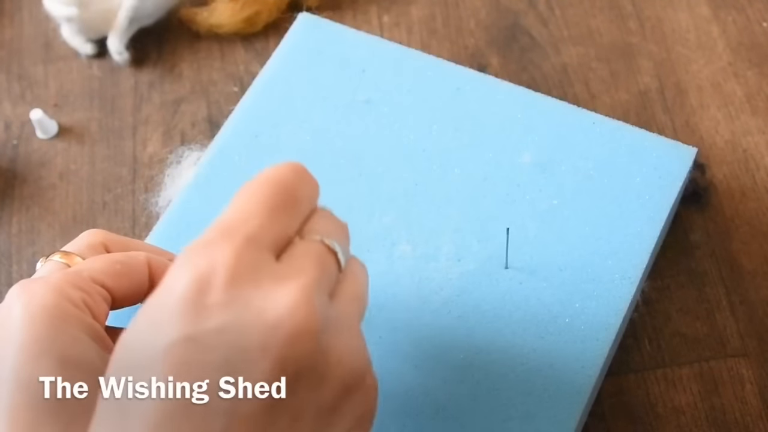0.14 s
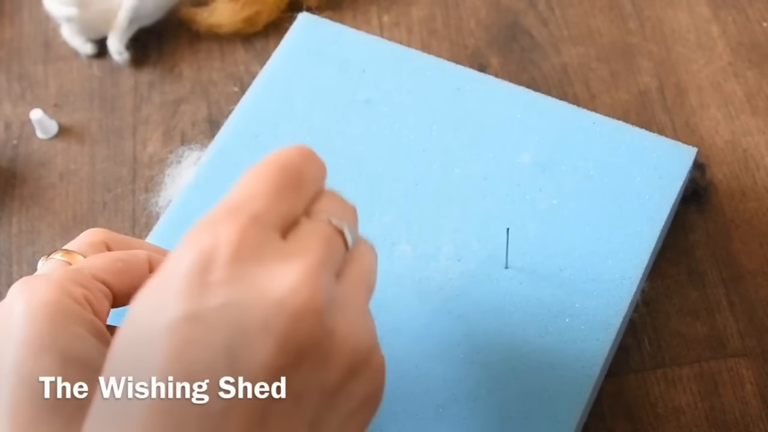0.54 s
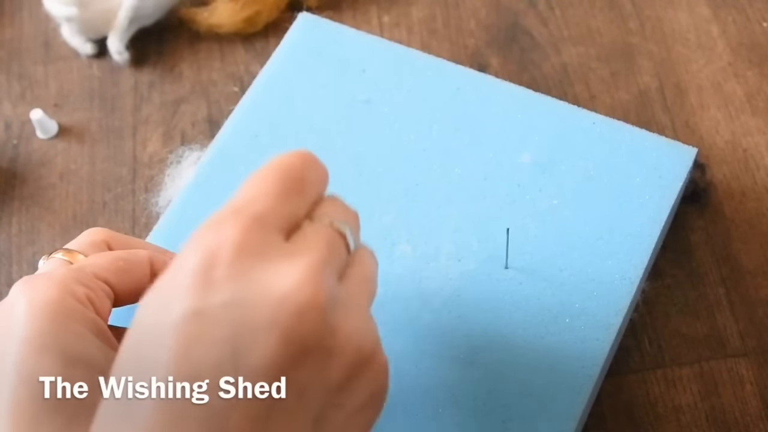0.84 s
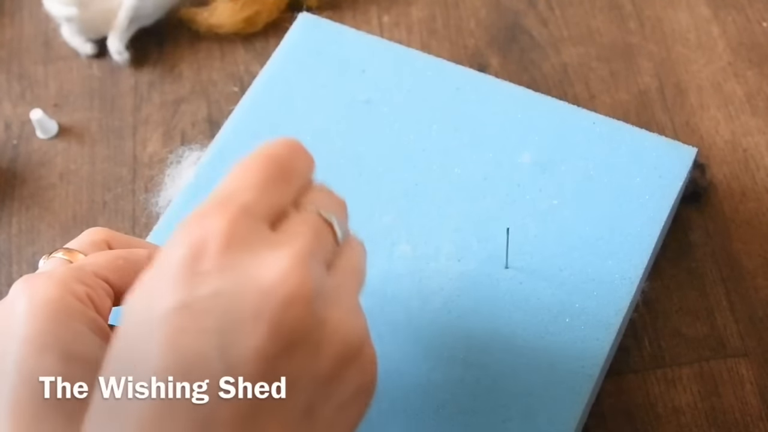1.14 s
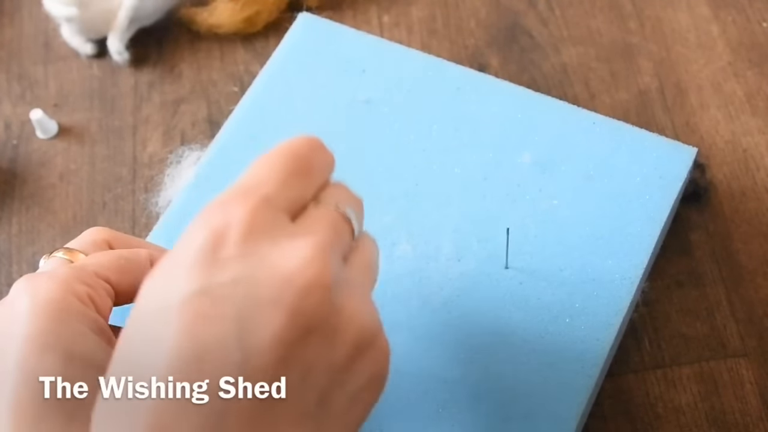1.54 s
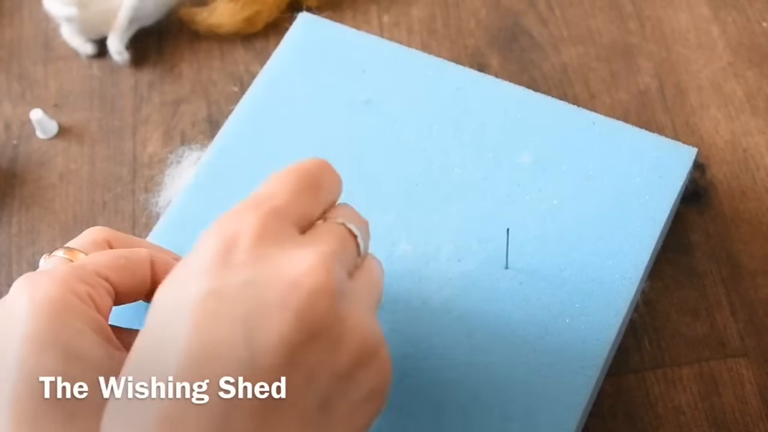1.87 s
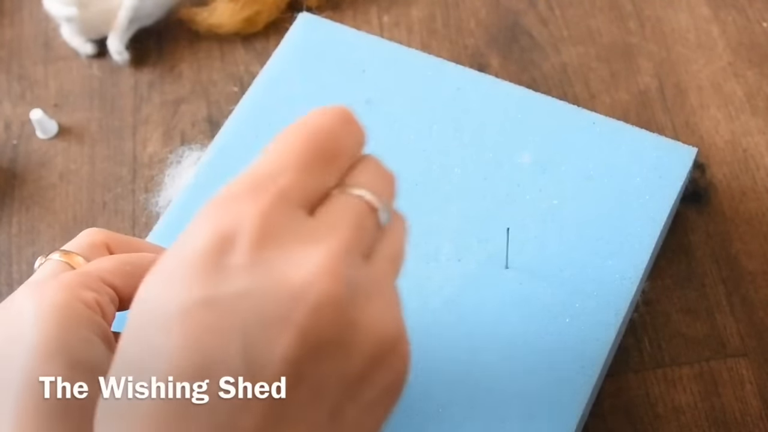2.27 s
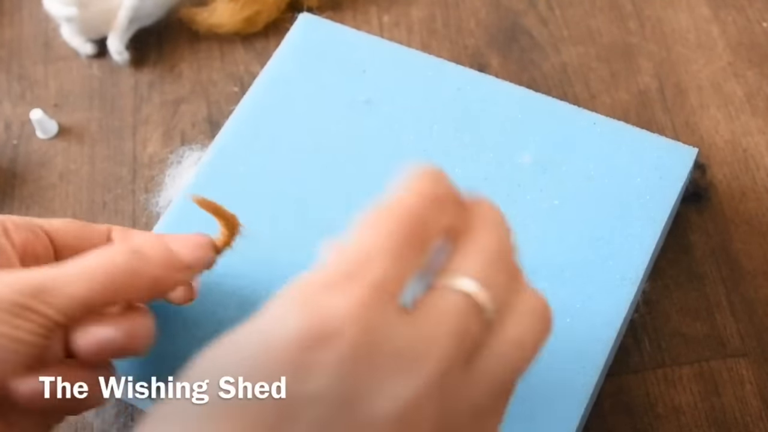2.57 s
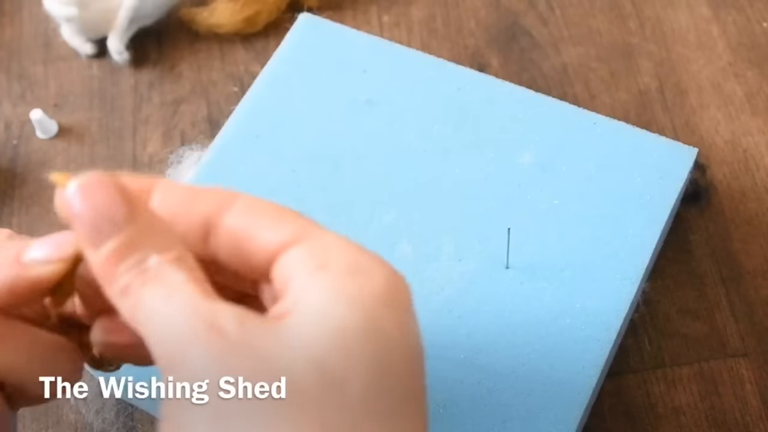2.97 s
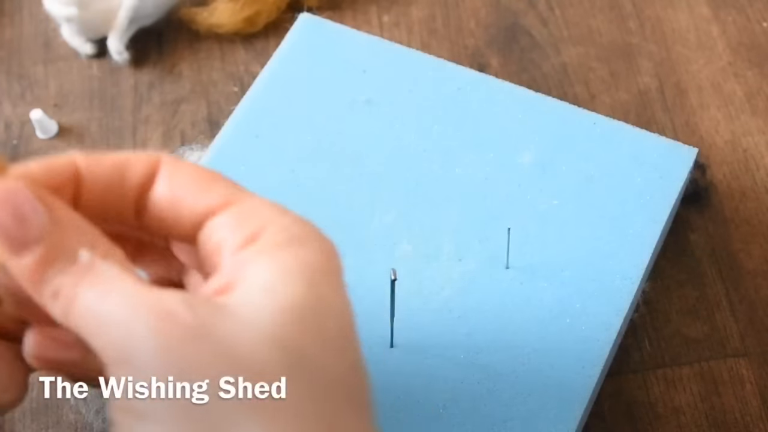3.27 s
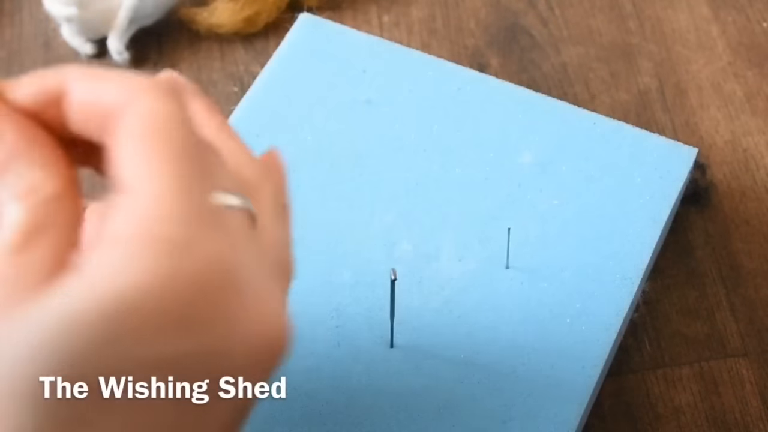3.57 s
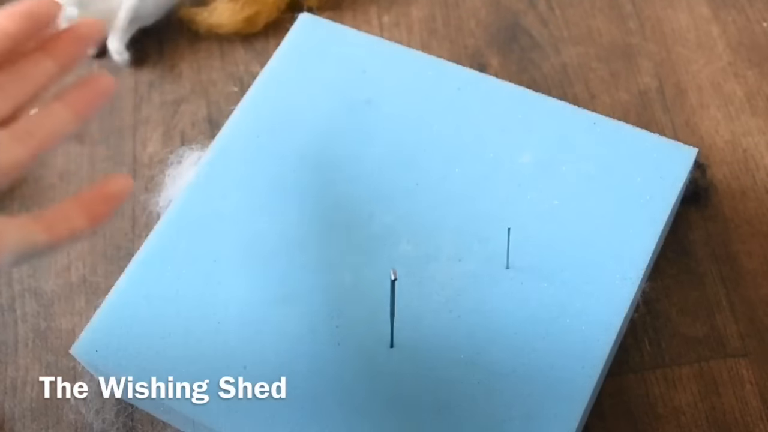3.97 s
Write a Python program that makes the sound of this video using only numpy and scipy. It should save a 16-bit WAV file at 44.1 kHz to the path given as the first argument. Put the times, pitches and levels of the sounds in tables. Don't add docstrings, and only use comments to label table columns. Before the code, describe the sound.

A small microphone sits close above a foam pad on a table in a quiet, dry room with a faint steady hush and slight low rumble. From 0 to about 2.25 s a barbed needle jabs a wool tuft roughly six times a second. Each jab is a short swelling crunch: a dull hollow foam thump with torn-fibre crackle and a thin steely edge, ending abruptly, then a weaker, smoother drag out. Strength varies; strong snaps fall near 0.1, 0.7, 1.06, 1.25 and 1.93 s. Around 2.5 s the needle goes into bare foam with a longer, rougher crackling crunch and a soft settling. Near-quiet follows, with tiny ticks at 2.7 s. At 3.14 s a finger ring clicks sharply with a tiny rattle as fingers roll the wool, a soft rasp with faint metallic pings until 3.3 s. Light ticks come at 3.6 s, then two airy wool pulls around 3.9 and 4.05 s.

```python
import sys
import numpy as np
from scipy import signal
from scipy.fft import rfft, irfft
from scipy.io import wavfile
from scipy.ndimage import uniform_filter1d

SR = 44100
rng = np.random.default_rng(int(sys.argv[2]) if len(sys.argv) > 2 else 0)


def undo_db(level):
    steps = np.asarray(level, float) / 20
    return 10 ** steps


def dump_mix(stems):
    frames = np.atleast_2d(stems).T
    limited = np.clip(frames, -1, 1)
    pcm = np.round(limited * 32767).astype(np.int16)
    wavfile.write(sys.argv[1], SR, pcm)


N = 181251
TIME = np.arange(N) / SR

# centre [Hz], width [Hz], level [dB]
PAD_MODES = [(699, 265, 4.5), (1052, 113, -2.5), (1300, 230, -0.5), (1990, 170, -8.5), (2145, 450, -4)]
# centre [Hz], width [Hz], level [dB]
NEEDLE_MODES = [(2930, 1720, 4), (4280, 580, -2), (5020, 650, 7), (7460, 1060, 3), (8400, 1750, 0),
                (9850, 840, -28), (11500, 480, -14.5), (14000, 3200, -13.5)]


def unit(x):
    return x / np.sqrt(np.mean(x ** 2))


def smooth_twice(x, first, second):
    return uniform_filter1d(uniform_filter1d(x, size=first), size=second)


def ring(x, modes, order=1):
    out = 0
    for k, (hz, width, db) in enumerate(modes):
        sharpness = max(hz / width / order ** .5, .3)
        b, a = signal.iirpeak(min(hz, .45 * SR), sharpness, fs=SR)
        one = x
        for _ in range(order):
            one = signal.lfilter(b, a, one)
        out = out + (-1) ** k * undo_db(db) * np.sqrt(1000 / width) * one
    return out


def crackle(rate, spread_db, fizz, clump_db):
    hit = rng.random(N) < rate / SR
    sign = np.sign(rng.standard_normal(N))
    size = undo_db(spread_db * np.minimum(rng.exponential(size=N), 3))
    clump = unit(smooth_twice(rng.standard_normal(N), 70, 70))
    return (unit(hit * sign * size) + fizz * rng.standard_normal(N)) * undo_db(clump_db * clump)


def frayed(x, ms):
    size = int(ms * SR / 1000) + 3
    burst = unit(np.hanning(size)) / np.sqrt(size)
    ragged = rng.uniform(-np.sqrt(3), np.sqrt(3), N)
    return signal.fftconvolve(x, burst, "same") * ragged


def add(out, s, db, burst):
    i = int(s * SR)
    out[i:i + len(burst)] += undo_db(db) * burst / np.abs(burst).max()


def swell(s, attack, hold, release, db, drift_db=0):
    moments = s + np.cumsum([0, attack, hold, release])
    levels = db + np.array([-30, 0, drift_db, drift_db - 30])
    return undo_db(np.interp(TIME, moments, levels, left=-200, right=-200))


def rubbed(gain, modes, grain):
    return ring(gain * grain, modes, order=2) / np.std(ring(grain, modes, order=2))


def room():
    # frequency [Hz], level [dB per Hz]
    hush = [(20, -18), (50, -12), (100, -5), (330, -3.5), (1500, -9.5), (3500, -12), (8000, -17.5),
            (15500, -26)]
    hz = np.maximum(np.fft.rfftfreq(N, 1 / SR), 1)
    f, db = np.transpose(hush)
    colour = undo_db(np.interp(np.log(hz), np.log(f), db))
    return undo_db(-58.5) * unit(irfft(rfft(rng.standard_normal(N)) * colour, N))


def rumble():
    wander = unit(smooth_twice(rng.standard_normal(N), 2500, 2500))
    table_top = [(129, 150, 0), (410, 60, -12)]  # Hz, width Hz, dB
    return undo_db(-76 + 5 * wander) * unit(ring(rng.standard_normal(N), table_top, order=2))


def ticks():
    # start [s], peak [dB], centre [Hz], length [ms]
    puffs = [(.5, -49, 8100, 2.9), (0.612, -45, 4300, .8), (.626, -50.5, 7600, 2.2),
             (.9535, -48, 8400, 1.2), (1.0156, -48.5, 300, 4.2), (1.4098, -41, 1200, 1.5),
             (1.6354, -46, 8500, .87), (1.6392, -45, 9000, .8), (1.6448, -48, 9000, .44),
             (2.06, -48, 900, 1.5), (2.0722, -36.5, 930, 0.97), (2.106, -42.5, 6940, 0.74),
             (2.2312, -38, 1480, 0.94), (2.236, -46, 410, 4), (2.293, -49, 1100, 3),
             (2.712, -47, 11500, 1.4), (2.718, -48, 10500, .8), (2.7212, -47, 8000, .6),
             (2.7292, -53, 12000, .6), (3.6175, -48, 9000, .3), (3.636, -48, 13500, .8),
             (3.661, -49, 5900, 0.87), (3.8695, -38, 10000, 1.9), (3.8701, -47, 14000, .58),
             (3.872, -48, 7100, .98), (3.8835, -45, 8000, .5), (3.9462, -39, 8400, .38)]
    out, n = np.zeros(N), np.arange(400)
    for s, db, hz, ms in puffs:
        u = n / (ms * SR / 1000)
        puff = rng.standard_normal(400) * u * np.exp(-2 * u)
        width = 0.34 * hz
        one = ring(puff, [(hz, width, 0)])
        add(out, s, db, ring(one, [(hz, 2.2 * width, 0)]))
    return out


def band(gain, grain):
    # centre [Hz], width [Hz], level [dB]
    band_modes = [(3730, 55, -2), (3800, 46, -1), (4125, 40, -5), (7760, 90, -6)]
    # start [s], peak [dB], pitch [Hz], width [Hz]
    nicks = [
        (3.1436, -57, 4125, 6.5),
        (3.247, -47, 3440, 70),
        (3.247, -53, 4140, 60),
        (3.267, -48, 3780, 65),
        (3.222, -55, 3750, 28),
        (3.288, -51, 3800, 21),
    ]
    out = undo_db(-10) * ring(gain * grain, band_modes) / np.std(ring(grain, band_modes))
    t = np.arange(4000) / SR
    for s, db, hz, width in nicks:
        fade = (1 - np.exp(-t / .002)) * np.exp(-np.pi * width * t)
        add(out, s, db, fade * np.sin(2 * np.pi * hz * t))
    return out


def ring_click(out):
    # centre [Hz], width [Hz], level [dB]
    click_modes = [(246, 370, -18), (1000, 130, -3), (2320, 200, 1), (3900, 920, 3), (6700, 550, 1),
                   (6490, 53, 4), (9600, 3200, 8.5), (9600, 68, 3), (10500, 49, -2), (11200, 90, -19),
                   (13500, 6600, -6)]
    finger_modes = [(197, 190, 3.0), (657, 92, -3), (1030, 170, -5.5)]  # Hz, width Hz, dB
    click_s, click_db = 3.1436, -28
    t = np.arange(2500) / SR
    fade = np.exp(-t / .0005) + .14 * np.exp(-t / .013)
    rattle = fade * np.sign(rng.standard_normal(len(t)))
    add(out, click_s, click_db, ring(rattle, click_modes))
    thud = np.exp(-t / 0.023) * rng.standard_normal(len(t))
    add(out, click_s, click_db - 17.0, ring(thud, finger_modes, order=2))


def fingers():
    # start [s], attack [s], hold [s], release [s], level [dB]
    roll_rubs = [
        (3.146, 0.0025, 0.0034, 0.12, -60.5),
        (3.115, 0.12, 0.043, 0.052, -50.5),
    ]
    # start [s], attack [s], hold [s], release [s], level [dB]
    pull_rubs = [
        (3.791, 0.092, 0.06, .16, -56.5),
        (3.946, .081, .047, .046, -51.5),
    ]
    # centre [Hz], width [Hz], level [dB]
    roll_tone = [(2430, 810, -2.5), (3600, 560, -2), (5670, 2700, -0.5), (7770, 630, -1), (9260, 1400, 2.5),
                 (11000, 1200, -5), (12400, 1500, 1.5), (14400, 500, -6), (15400, 800, -14)]
    # centre [Hz], width [Hz], level [dB]
    pull_tone = [(600, 620, -27), (3230, 2500, -2), (5400, 1900, -0.5), (8600, 3100, 3), (14000, 3000, -4)]
    press_db = 4
    rolling = sum(swell(*rub, press_db) for rub in roll_rubs)
    pulling = sum(swell(*rub, press_db) for rub in pull_rubs)
    rasp = frayed(np.abs(crackle(1700, 2.4, 0.7, 1.1)), 0.48)
    out = rubbed(rolling, roll_tone, rasp) + band(rolling, rasp)
    out += rubbed(pulling, pull_tone, crackle(6000, 2.0, 0.95, 0.6))
    ring_click(out)
    return out


def stab():
    # centre [Hz], width [Hz], level [dB]
    block_modes = [(273, 260, -14), (543, 190, -4.5), (1030, 440, -13), (1800, 210, -3.5),
                   (2320, 210, -8.5), (3450, 700, 0.5)]
    # centre [Hz], width [Hz], level [dB]
    cell_tone = [(5510, 540, -1), (6940, 1800, -14.5), (8400, 1040, -3.5), (10500, 1800, -19),
                 (12640, 920, -8.5), (14800, 1200, -20)]
    # Hz, width Hz, dB
    closing_tone = [(673, 1700, -1.5), (3020, 2200, -3.0), (6000, 3000, -1.5),
                    (9000, 3600, -4.0), (13500, 4000, -9)]
    s, attack = 2.477, 0.012
    burst = np.abs(crackle(600, 3.0, .4, 2.5))
    giving = swell(s, attack, hold=0.034, release=0.056, db=-33, drift_db=-4.5)
    bursting = swell(s, attack, hold=0.04, release=0.053, db=-36, drift_db=-1.5)
    closing = swell(s, 0.067, hold=.001, release=0.17, db=-46)
    block = rubbed(giving, block_modes, frayed(burst, 1.3))
    cells = rubbed(bursting, cell_tone, frayed(burst, 1.3))
    settle = rubbed(closing, closing_tone, crackle(3000, 2.7, .9, 1.0))
    return block + cells + settle


def snaps():
    # start [s], pad peak [dB], bright peak [dB]
    fibres = [(.0008, -35.5, -58), (.0835, -31, -56), (.087, -19.5, -33.5), (0.1015, -34, -37),
              (.2609, -36, -29), (.3924, -38, -43), (.4110, -32, -32.5), (.4285, -49, -35),
              (0.5435, -28.5, -36), (.5563, -32, -56), (.7094, -36.5, -42), (0.7174, -20.5, -55),
              (.8692, -31.5, -45), (1.053, -29, -57), (1.0624, -21, -30), (1.0654, -44, -28.5),
              (1.0784, -46, -29.5), (1.2430, -23, -31), (1.2527, -31, -30), (1.2612, -29.5, -27.5),
              (1.423, -25.5, -38), (1.564, -33, -56), (1.7509, -32.5, -35), (1.7693, -36.5, -36),
              (1.9197, -26.5, -44), (1.9313, -18.5, -25), (1.9454, -59, -28), (2.0797, -31, -37.5),
              (2.0950, -25.5, -38.5), (2.2382, -36, -42)]
    # start [s], pad peak [dB], bright peak [dB]
    catches = [
        (2.4766, -51, -46),
        (2.4921, -28.5, -32),
        (2.5160, -34, -24),
        (2.524, -33, -32),
    ]
    s, pad_db, bright_db = np.transpose(np.vstack([fibres, catches]))
    u = np.arange(400) / (.0006 * SR)
    steel, blows = np.zeros(N), np.zeros(N)
    for at, db in zip(s, bright_db):
        tearing = rng.uniform(-2.5, 1, 400) * u * np.exp(-u)
        add(steel, at - .0002, db + 1, ring(tearing, NEEDLE_MODES, order=2))
    np.add.at(blows, (s * SR).astype(int), undo_db(pad_db + 1.0))
    pad_peak = np.abs(ring(np.eye(1, 600)[0], PAD_MODES)).max()
    return -blows / pad_peak, steel


def strokes():
    # needle at rest [s], push length [s], pad thump [dB], bright crackle [dB],
    # drag out against these two [dB]
    jabs = [(.008, 0.036, -47, -55.5, -12.5), (.125, .06, -44, -50.5, -10.5), (.274, 0.044, -37, -37, -15),
            (0.426, 0.044, -37, -43, -15), (.559, 0.024, -49, -62, -8.5), (.727, 0.041, -51, -66, -1),
            (.876, 0.018, -52.5, -61, -6), (1.082, 0.038, -37.5, -37.5, -12.5),
            (1.269, 0.046, -38.5, -40, -12), (1.445, 0.057, -43, -44.5, -13.5),
            (1.571, 0.015, -59, -76, -9), (1.775, 0.045, -45.5, -49, -9.5), (1.952, 0.049, -39, -40, -13),
            (2.108, 0.057, -45, -51.5, -8), (2.246, 0.045, -54.5, -58.5, -4.5)]
    brake_share, drag_s = .38, 0.11
    push, drag = np.zeros((2, N)), np.zeros((2, N))
    for rest, length, pad_db, bright_db, drag_db in jabs:
        fall = brake_share * length
        s, rise = rest - fall, length - fall
        gain = undo_db([[pad_db], [bright_db]])
        biting = undo_db(-24 * np.abs((s - TIME) / rise) ** 1.49)
        braking = undo_db(-12 * np.abs((TIME - s) / fall) ** 3.5)
        push += gain * np.where(TIME < s, biting, braking)
        out = (TIME - s - fall) / drag_s
        drag += gain * (TIME > s) * undo_db(drag_db - 4.7 * out - 16.2 * np.maximum(out, 0) ** 2.15)
    return push, drag


def needle():
    # centre [Hz], width [Hz], level [dB]
    slab_modes = [(163, 190, -8.5), (317, 55, -6.5), (394, 84, 2), (530, 590, -13)]
    # centre [Hz], width [Hz], level [dB]
    wool_modes = [(615, 540, -1), (1530, 1200, 1.5), (2340, 740, -6.5)]
    # centre [Hz], width [Hz], level [dB]
    fluff_modes = [(3380, 2900, 3.5), (5300, 2500, 0.5), (7360, 2500, -1.5), (12000, 3600, -13)]
    push, drag = strokes()
    tear = frayed(np.abs(crackle(1100, 2.4, 0.65, 2.8)), 0.96)
    shove = .5 * tear + crackle(900, 3.5, 0.58, 1.6)
    slide = crackle(3000, 3.0, .9, 1.2)
    blows, rips = snaps()
    force = push[0] * shove / np.std(ring(shove, PAD_MODES)) + blows
    force = smooth_twice(force, 4, 5)
    thump = ring(force, PAD_MODES) - undo_db(-4) * ring(force, slab_modes)
    steel = rubbed(push[1], NEEDLE_MODES, tear)
    tuft = ring(drag[0] * slide, wool_modes) / np.std(ring(slide, wool_modes))
    fluff = rubbed(drag[1], fluff_modes, slide)
    return thump + tuft + fluff + steel + rips


def echo(near):
    t = np.arange(int(.3 * SR)) / SR
    tail = (t > .003) * rng.standard_normal(len(t)) * undo_db(-60 * t / 0.073)
    tail = uniform_filter1d(tail, size=2)
    return undo_db(-15) * signal.fftconvolve(near, tail / np.sqrt(np.sum(tail ** 2)))[:N]


def scene():
    near = needle() + stab() + fingers() + ticks()
    return (near + echo(near) + room() + rumble())[None]


def low_pass(x):
    return signal.sosfilt(signal.butter(12, 16440, fs=SR, output="sos"), x)


def record(dry):
    top = signal.ellip(10, .3, 40, 15780, fs=SR, output="sos")
    mix = signal.sosfilt(top, dry)
    return low_pass(mix)


dry = scene()
out = record(dry)
dump_mix(out)
```